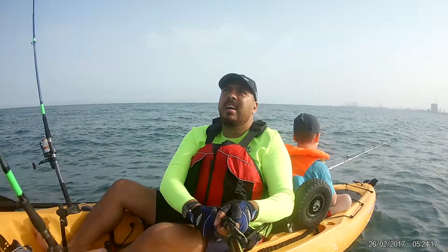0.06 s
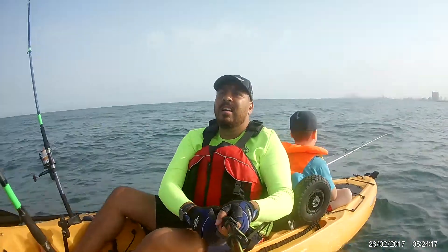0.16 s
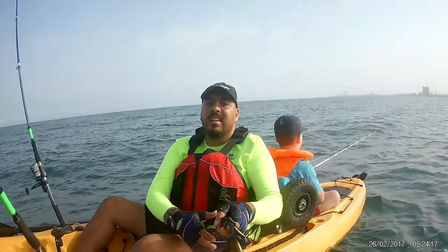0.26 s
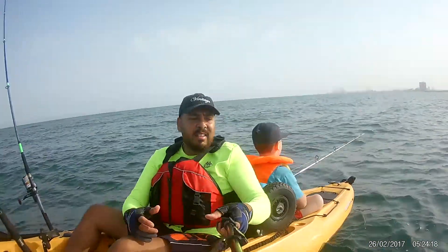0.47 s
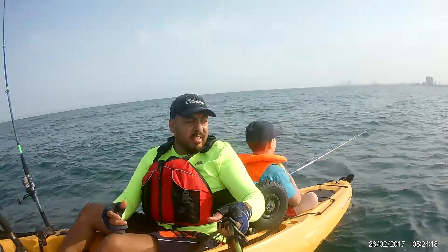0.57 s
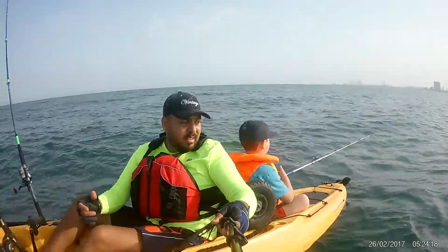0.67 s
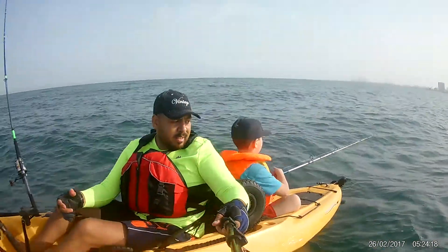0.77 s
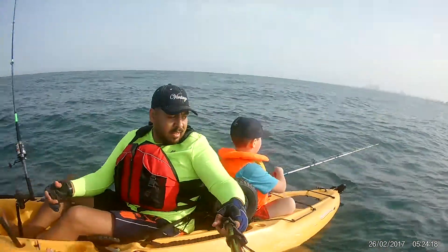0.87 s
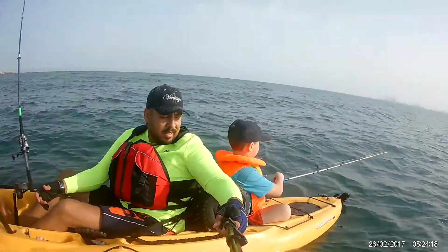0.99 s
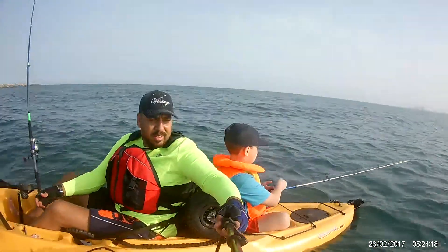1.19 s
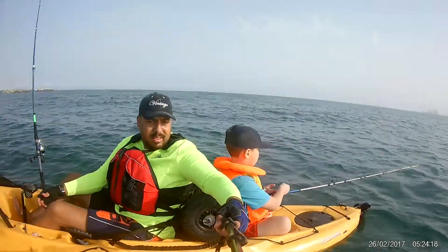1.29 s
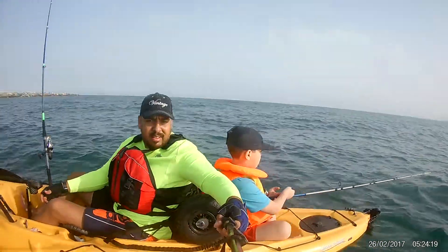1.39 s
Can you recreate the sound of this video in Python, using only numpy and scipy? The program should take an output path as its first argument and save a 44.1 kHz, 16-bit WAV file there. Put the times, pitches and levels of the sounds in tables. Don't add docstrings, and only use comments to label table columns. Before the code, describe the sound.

A camera in a plastic case is swung on a handheld pole in a small boat at sea: muffled thumps, a loud squeaking double clunk, then sparse taps, picked up from inside the case over faint low rumble.

```python
import sys
import numpy as np
from scipy import signal
from scipy.fft import rfft, irfft
from scipy.io import wavfile

SR = 44100
rng = np.random.default_rng(int(sys.argv[2]) if len(sys.argv) > 2 else 0)


def invert_db(level):
    return 10 ** (np.asarray(level, dtype=float) / 20)


def wav_record(signal):
    frames = np.transpose(np.atleast_2d(signal))
    bounded = np.clip(frames, -1, 1)
    quanta = np.round(bounded * 32767).astype(np.int16)
    wavfile.write(sys.argv[1], SR, quanta)


N = 63945
TIME = np.arange(N) / SR


def rms_one(x):
    return x / np.sqrt(np.mean(x ** 2) + 1e-20)


def level_in_time(rows):
    return invert_db(np.interp(TIME, *np.transpose(rows)))


def coloured(points):
    hz = np.maximum(np.fft.rfftfreq(N, 1 / SR), 1)
    point_hz, point_db = np.transpose(points)
    colour = invert_db(np.interp(np.log(hz), np.log(point_hz), point_db))
    colour = colour * np.minimum(1, point_hz[-1] / hz) ** 2
    return rms_one(irfft(rfft(rng.standard_normal(N)) * colour, N))


def ring(force, hz, t60):
    skirt = 1.25
    decay, turn = invert_db(-60 / (t60 * SR)), 2 * np.pi * hz / SR
    tone = signal.lfilter([0, np.sin(turn)], [1, -2 * decay * np.cos(turn), decay ** 2], force + 1e-18)
    soft = signal.butter(1, [hz / skirt, hz * skirt], "band", fs=SR)
    return signal.lfilter(*soft, tone)


def struck(modes, s, db):
    spread_db = 3.5
    out, luck = 0, rng.standard_normal((len(s), len(modes)))
    for k, (hz, mode_db, t60) in enumerate(modes):
        force = np.zeros(N)
        force[(np.asarray(s) * SR).astype(int)] = invert_db(db + mode_db + spread_db * luck[:, k])
        out = out + ring(force, hz, t60) * (-1) ** k
    return out


def held(modes, s, db, held_s, fade_s):
    early = s < held_s
    fade = np.exp(-np.maximum(TIME - held_s, 0) / fade_s)
    return struck(modes, s[early], db[early]) * fade + struck(modes, s[~early], db[~early])


def rubbed(modes, pressure):
    slips_per_s, spread_db = 6000, 2
    out = 0
    for hz, mode_db, t60 in modes:
        slips = rng.random(N) < slips_per_s / SR
        slips = slips * invert_db(spread_db * rng.exponential(1, N))
        slips = slips * rng.choice([-1, 1], N)
        evened = np.sqrt(28 / (t60 * SR))
        out = out + invert_db(mode_db) * ring(rms_one(slips) * pressure, hz, t60) * evened
    return out


# [f/Hz, level/dB per Hz]
RUMBLE = [(26, -25.5), (45, -2), (70, -15), (101, -16), (169, -20.5), (500, -32), (1300, -38),
          (2500, -46.5)]
# [f/Hz, level/dB per Hz]
HISS_COLOUR = [(1500, -12), (2500, 4.5), (4000, 3.5), (7500, -1), (11000, -1), (15800, 0)]


def rumble_and_hiss():
    rumble_db, hiss_db = -56.5, -77
    return invert_db(rumble_db) * coloured(RUMBLE) + invert_db(hiss_db) * coloured(HISS_COLOUR)


# [t/s, level/dB]
SWAY = [(0.0, -42.5), (0.064, -66), (0.096, -50), (0.136, -40), (0.176, -30.5), (0.286, -46), (0.31, -47.5),
        (0.508, -41.5), (0.588, -53.5), (0.69, -38), (1.11, -52), (1.126, -41.5), (1.332, -71), (1.45, -46)]


def sway():
    hz, width_hz = 33, 11
    push = rng.standard_normal(N + SR)
    swing = ring(push, hz, 2.5 / width_hz)[SR:]
    return level_in_time(SWAY) * rms_one(swing)


def singing():
    start_s, hz, db, t60_s = .438, 632, -29, .55
    stop_s, fade_s = .69, .012
    damping = np.exp(-np.maximum(TIME - stop_s, 0) / fade_s)
    return struck([(hz, 0, t60_s)], [start_s], db) * damping


# [f/Hz, level/dB, t60/s]
SHELL = [(2480, -1.5, 0.018), (3250, 1, .015), (3700, -13, 0.015), (4100, -6, .012), (4500, -6.5, .01),
         (5300, -13.5, .008), (5900, -7.5, 0.011), (6600, -10, 0.0084), (7300, -16, .008)]
# [t/s, level/dB, dulling/dB per kHz]
TICKS = [
    (.5255, -52.5, -4.5),
    (0.7167, -46.5, 1.4),
    (0.767, -61, -7),
    (1.12, -65.5, 0),
]


def ticks():
    out = 0
    for s, db, dull_db in TICKS:
        tilted = [(hz, mode_db + dull_db * (hz / 1000 - 3), t60) for hz, mode_db, t60 in SHELL]
        out = out + struck(tilted, [s], db)
    return out


# [f/Hz, level/dB, t60/s]
SHAFT = [(92, 2.5, .15), (54.9, -8, 0.07)]
# [f/Hz, level/dB, t60/s]
JOINT = [(150.1, 3, 0.15), (190, -25, .08), (428, -18, 0.023), (840, -26, 0.034)]
# [f/Hz, level/dB, t60/s]
OVERTONE = [(297, 0, .2)]
# [f/Hz, level/dB, t60/s]
CLAMP = [(526.7, 1.5, 0.097), (571.4, -7.5, .05), (643, -6.5, .04), (481, -14, 0.024)]
# [f/Hz, level/dB, t60/s]
CASE = [(858.8, -23, 0.086), (990, -21.5, 0.014), (1176.2, -4.5, 0.041), (1323, -9, 0.068),
        (1455, -9, .035), (1614, -10.5, .03), (1683, -12, .035), (1857, -16, .035), (2050, -27, .03),
        (2200, -22.5, .03), (2450, -27, 0.049), (2600, -28.5, .03)]
# [t/s, level in the case/dB]
GRIP = [(0.0, -62), (0.076, -51), (0.188, -59.5), (0.476, -70.5), (0.608, -68.5), (0.754, -77),
        (0.908, -70.5), (1.45, -81)]
# [t/s, length/s, case level/dB, clamp level/dB, shell level/dB]
RUBS = [(.184, .035, -33.5, -36, -64), (0.214, 0.024, -40.5, -44.5, -71.5), (0.4, 0.03, -56, -42.5, -98.5),
        (0.434, 0.016, -16.5, -28.5, -65), (0.452, 0.017, -24.5, -30, -72.5),
        (0.481, .045, -46.5, -50.5, -78.5), (0.285, .02, -73.5, -71, -98), (0.632, .012, -61, -67.5, -82.5),
        (0.66, 0.017, -57.5, -58, -96.5), (0.677, 0.0054, -40, -48, -76.5),
        (0.749, 0.03, -45.5, -58.5, -82), (0.775, 0.019, -43, -56, -78.5), (0.809, 0.019, -61.5, -71, -89),
        (1.104, .024, -58.5, -56.5, -85), (1.233, 0.041, -57, -61.5, -90), (1.27, .012, -60, -57, -94),
        (1.3, .025, -72, -77, -94), (1.413, 0.0082, -67, -94, -92)]


def rubs():
    rise_share, fall_s = .35, 0.0024
    wobble_db, wobble_s = 3, 0.0078
    drift = signal.lfilter([1], [1, -np.exp(-1 / (wobble_s * SR))], rng.standard_normal(N))
    wobble = invert_db(wobble_db * rms_one(drift))
    grip = level_in_time(GRIP)
    case, clamp, shell = grip, grip * invert_db(-7), grip * invert_db(-31)
    for s, length, case_db, clamp_db, shell_db in RUBS:
        swell = np.clip((TIME - s) / (rise_share * length), 0, 1)
        shape = wobble * swell * np.exp(-np.maximum(TIME - s - length, 0) / fall_s)
        case = case + invert_db(case_db) * shape
        clamp = clamp + invert_db(clamp_db) * shape
        shell = shell + invert_db(shell_db) * shape
    pole = rubbed(JOINT[:2] + OVERTONE, grip * invert_db(-2)) + rubbed(SHAFT, grip * invert_db(8.5))
    return rubbed(CASE, case) + rubbed(CLAMP, clamp) + rubbed(SHELL[:6], shell) + pole


# [t/s, length/s, start f/Hz, end f/Hz, level/dB]
SQUEAKS = [
    (.4365, .016, 1260, 1179, -4.5),
    (.4385, 0.013, 1501, 1531, -17.5),
    (.455, .012, 1460, 1394, -15.5),
    (.455, 0.017, 1280, 1199, -24.5),
    (.779, 0.0049, 1519, 1520, -32.5),
    (0.4359, .008, 649.3, 619, -23.5),
]


def squeaks():
    rise_s, fall_s = 0.0065, 0.0052
    out = 0
    for s, length, from_hz, to_hz, db in SQUEAKS:
        t = TIME - s
        hz = from_hz + (to_hz - from_hz) * np.clip(t / length, 0, 1)
        shape = np.clip(t / rise_s, 0, 1) * np.exp(-np.maximum(t - length, 0) / fall_s)
        out = out + invert_db(db) * shape * np.sin(2 * np.pi * np.cumsum(hz * (t > 0)) / SR)
    return out


# [t/s, level/dB]
BENDS = [(0.058, -76), (0.196, -32), (0.392, -39), (.44, -38.5), (.527, -40), (.68, -46), (.718, -40),
         (1.119, -46.5)]
# [t/s, shaft level/dB, joint level/dB, clamp level/dB, case level/dB]
KNOCKS = [(.001, -41.5, -47, -56.5, -46), (0.051, -37, -44.5, -78, -52.5), (0.082, -40.5, -47, -53, -59),
          (0.109, -45.5, -38.5, -59, -48), (0.136, -34, -41, -56, -56.5), (0.169, -30, -38.5, -71, -45.5),
          (.187, -18, -46, -43, -51), (.198, -24, -30.5, -39, -39), (0.207, -21, -30, -40.5, -23.5),
          (.245, -28, -33, -49, -60), (.262, -25, -44, -52.5, -77), (0.323, -36.5, -52, -70.5, -71),
          (.378, -28, -20.5, -48.5, -51.5), (.393, -26, -16.5, -34.5, -47.5),
          (0.4371, -26, -41, -30.5, -17.5), (.453, -35.5, -42.5, -21.5, -25.5),
          (.526, -39, -38.5, -55.5, -56.5), (.609, -47, -47, -71, -51), (.681, -47.5, -47, -53.5, -52),
          (.717, -37.5, -34, -45, -32), (0.785, -68, -65, -55, -28), (1.119, -49.5, -36.5, -49, -43.5),
          (1.257, -56.5, -52, -63, -75), (1.277, -67.5, -58, -58, -73)]


def knocks():
    s, shaft_db, joint_db, clamp_db, case_db = np.transpose(KNOCKS)
    pole = held(SHAFT, s, shaft_db, held_s=.298, fade_s=0.0079)
    pole = pole + held(JOINT, s, joint_db, held_s=.45, fade_s=.02)
    camera = struck(CLAMP, s, clamp_db) + struck(CASE, s, case_db)
    return pole + camera + struck(OVERTONE, *np.transpose(BENDS))


def scene():
    wall = signal.butter(6, 4300, fs=SR, output="sos")
    body = signal.sosfilt(wall, knocks() + rubs() + squeaks())
    return (body + ticks() + singing() + sway() + rumble_and_hiss())[None]


def roll_off(x):
    return signal.sosfilt(signal.butter(12, 15800, fs=SR, output="sos"), x)


def record(dry):
    low_cut = signal.butter(2, 20, "high", fs=SR, output="sos")
    mix = signal.sosfilt(low_cut, dry)
    return roll_off(mix)


dry = scene()
out = record(dry)
wav_record(out)
```